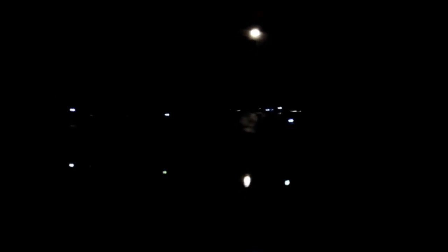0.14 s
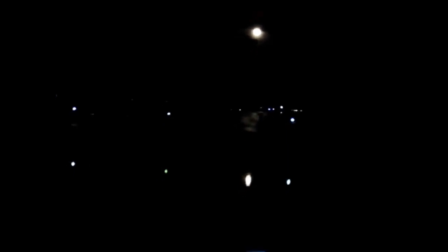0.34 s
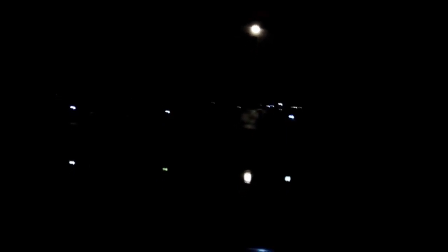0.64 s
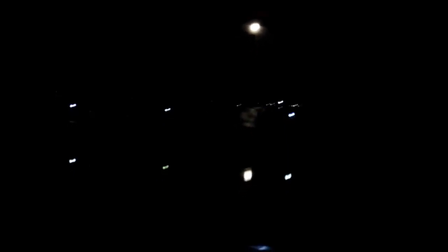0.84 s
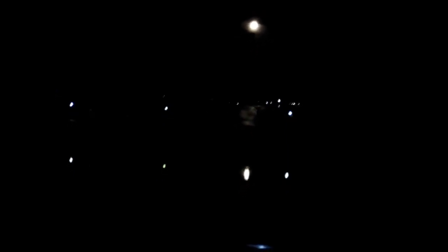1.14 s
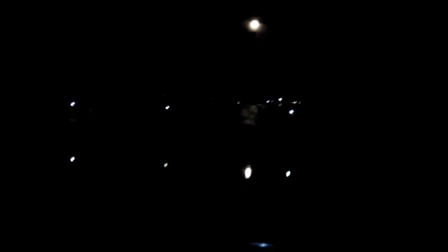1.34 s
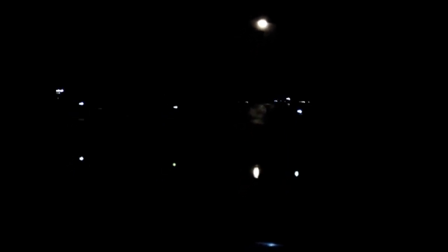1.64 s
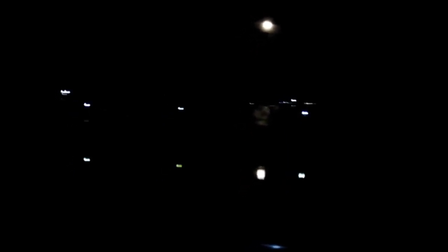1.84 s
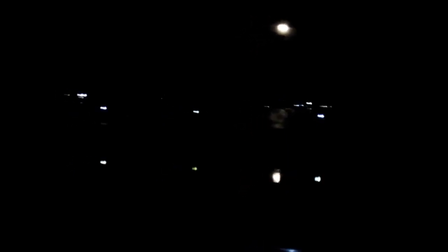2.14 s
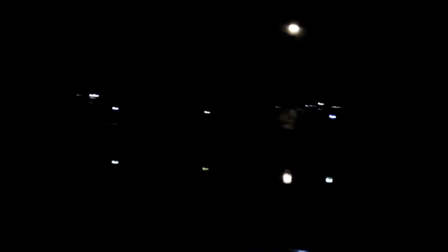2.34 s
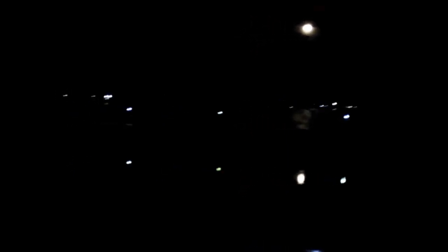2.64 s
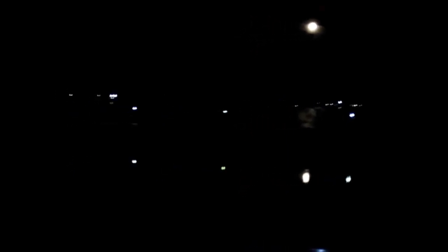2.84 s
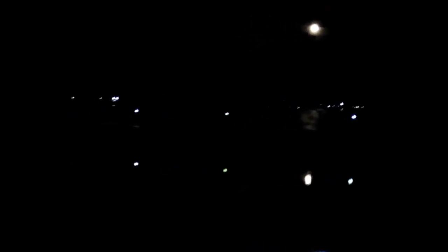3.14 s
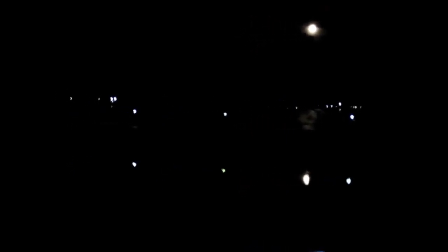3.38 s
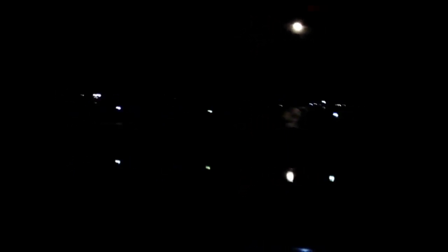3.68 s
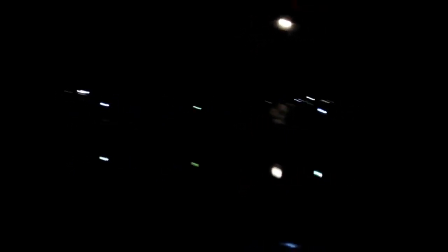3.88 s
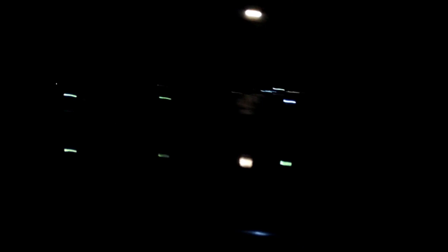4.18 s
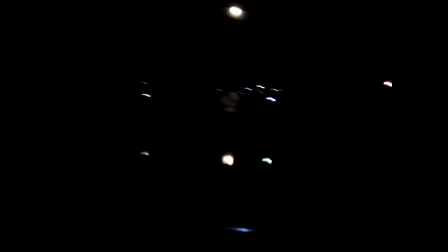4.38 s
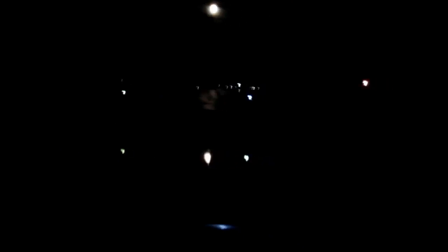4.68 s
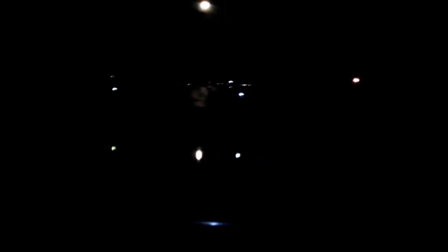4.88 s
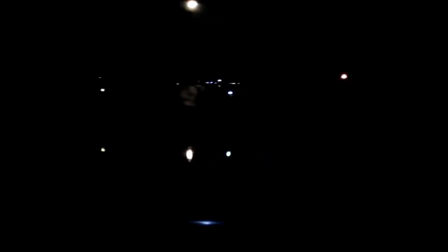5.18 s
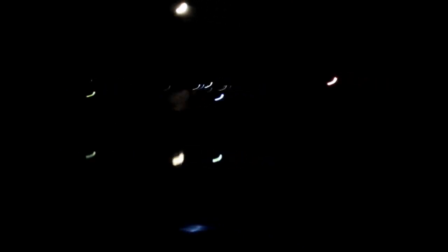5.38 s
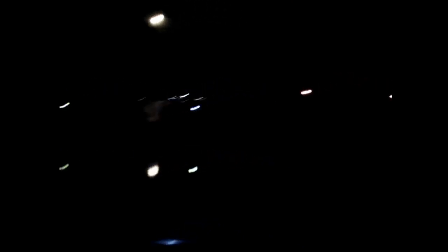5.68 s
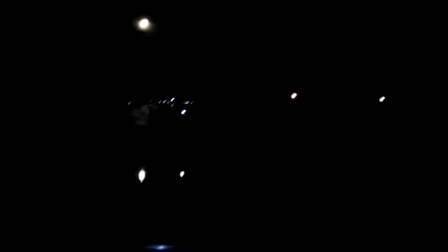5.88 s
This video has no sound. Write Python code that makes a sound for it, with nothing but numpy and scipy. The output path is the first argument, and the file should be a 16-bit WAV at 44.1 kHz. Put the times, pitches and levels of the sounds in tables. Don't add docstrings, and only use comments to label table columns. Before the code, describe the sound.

A phone's one microphone hears a dark shore at night. Continuous shrill chatter from hundreds of far birds begins quietly, with only a few low near calls. Soon clear high pipes and hoarse middle whistles join, overlapping with deeper birds and small shrill ones, echoing briefly off banks and water. The chorus pulses quickly and ends at its loudest. Steady hiss, very high insect fizz, thin electronic whine and soft far traffic stay underneath.

```python
import sys
import numpy as np
from scipy import signal
from scipy.fft import rfft, irfft, next_fast_len
from scipy.io import wavfile
from scipy.ndimage import uniform_filter1d

SR = 44100
rng = np.random.default_rng(int(sys.argv[2]) if len(sys.argv) > 2 else 0)


def pcm_store(signal):
    levels = np.round(np.clip(np.atleast_2d(signal), -1, 1) * 32767)
    wavfile.write(sys.argv[1], SR, levels.astype(np.int16).T)


def gain_from_db(level_db):
    decades = np.asarray(level_db, float) / 20
    return 10 ** decades


N = 265393


def evened(x):
    return x / np.sqrt(np.mean(x ** 2) + 1e-20)


def coloured(x, points):
    curve_hz, curve_db = np.transpose(points)
    size = next_fast_len(N)
    hz = np.fft.rfftfreq(size, 1 / SR)
    level_db = np.interp(np.log(hz + 1), np.log(curve_hz + 1), curve_db, left=-200, right=-200)
    gain = gain_from_db(level_db) * (hz < 15720)
    return evened(irfft(rfft(x, size) * gain, size)[:N])


def drift(seconds):
    span = max(round(seconds * SR), 1)
    once = uniform_filter1d(rng.standard_normal(N), span)
    return evened(uniform_filter1d(once, span))


def add(mix, start_s, sound):
    part = mix[max(round(start_s * SR), 0):][:len(sound)]
    part += sound[:len(part)]


def rasp(share, seconds):
    beats = drift(seconds) + 1j * drift(seconds)
    breath = drift(seconds / 4) + 1j * drift(seconds / 4)
    waver = np.exp(.8j * drift(.014))
    return waver * (np.sqrt(1 - share) + np.sqrt(share / 2) * (.9 * beats + .44 * breath))


def whistle(length_s, start_hz, middle_hz, end_hz, rough, partials=(1.,), edge=0.76):
    u = np.linspace(0, 1, max(round(length_s * SR), 8))
    hz = (1 - u) * (1 - 2 * u) * start_hz
    hz += 4 * u * (1 - u) * middle_hz
    hz += u * (2 * u - 1) * end_hz
    phase = 2 * np.pi * np.cumsum(hz) / SR
    tone = sum(a * np.exp(1j * (k + 1) * phase) for k, a in enumerate(partials))
    at = int(rng.random() * (N - SR))
    rough_tone = evened((tone * rough[at:at + len(u)]).real)
    return np.sqrt(len(partials)) * rough_tone * signal.windows.tukey(len(u), edge)


def shore(x, t60, wet_db):
    at = np.arange(40, SR // 2, 22)
    taps = np.zeros(SR)
    signs = rng.choice([-1., 1.], len(at))
    taps[at + rng.integers(0, 22, len(at))] = signs * gain_from_db(-60 * at / SR / t60)
    taps *= gain_from_db(wet_db) / np.linalg.norm(taps)
    taps[0] = 1
    return signal.fftconvolve(x, taps / np.linalg.norm(taps))[:N]


# (pitch_hz, level_db)
NIGHT_TONE = [(12, -54), (20, -17.5), (65, -4), (134, -2.5), (182, -5), (280, -5), (321, -6), (415, -7.5),
              (476, -7), (867, -9.5), (1200, -13.5), (1560, -50), (2640, -120)]


def night_rumble():
    air = coloured(rng.standard_normal(N), NIGHT_TONE) * gain_from_db(-61 + 1.4 * drift(0.036))
    hum = coloured(rng.standard_normal(N), [(100, -28), (140, -10), (180, -29.0)])
    return air + hum * gain_from_db(-71.5 + 5.5 * drift(0.024))


def microphone_hiss():
    tone = [(1000, 6.0), (7000, 3.5), (10000, 1.5), (15900, 1.5)]
    return coloured(rng.standard_normal(N), tone) * gain_from_db(-56.5)


# (pitch_hz, level_db)
LAMP_TONES = [
    (6449, -70),
    (12898, -82),
]


def lamp_whine():
    turns = np.cumsum(1 + 0.00016 * drift(0.12)) / SR
    return sum(np.sqrt(2) * gain_from_db(db) * np.sin(2 * np.pi * hz * turns) for hz, db in LAMP_TONES)


# (pitch_hz, level_db)
INSECT_TONE = [(13000, -55), (13900, -16), (14900, -6.5), (15400, -1.5), (15720, -1)]


def insects():
    swell_db = 1.3 * drift(0.0017) + 0.64 * drift(0.038) + 1.1 * drift(0.13)
    ticks = rng.standard_normal(N) * gain_from_db(swell_db)
    return gain_from_db(-52) * coloured(ticks, INSECT_TONE)


# (pitch_hz, level_db)
FLOCK_TONE = [(650, -24), (1100, -16.5), (1720, 1), (2190, -4), (3030, -2), (3580, 0), (4120, -3.5),
              (5510, -1.5), (6610, -4.5), (8000, -17.5), (10400, -51), (17600, -120)]
# (time_s, effort_db)
FLOCK_EFFORT = [(0, -53.5), (.45, -52.5), (.69, -51.5), (1.34, -51.5), (1.79, -51), (2.16, -49.5),
                (2.75, -46), (2.97, -50.5), (3.5, -47), (3.9, -46.5), (4.34, -50), (4.74, -42.5),
                (4.89, -47), (5.05, -43.5), (5.19, -45.5), (5.5, -43), (5.65, -44), (6.02, -42.5)]


def far_flock():
    calls, rough = np.zeros(N), rasp(share=.7, seconds=.003)
    for when, size, pitch, bend, length in rng.random((900, 5)):
        hz = 1150 * (2250 / 1150) ** pitch
        arch = hz * (.99 - .06 * bend), hz, hz * (.92 + .07 * bend)
        call = whistle(.05 + .1 * length, *arch, rough, (1., 1., 1., 1.))
        add(calls, when * N / SR - .06, gain_from_db(5. * size) * call)
    blur = evened(shore(calls, t60=.2, wet_db=-3.)) + .8 * rng.standard_normal(N)
    hz, t, z = signal.stft(blur, SR, nperseg=512)
    z /= np.sqrt(np.mean(abs(z) ** 2, axis=1))[:, None]

    time_s, effort_db = np.transpose(FLOCK_EFFORT)
    extra_db = np.interp(t, time_s, effort_db) + 51
    low = np.clip((2500 - hz) / 400, 0, 1)[:, None]
    shrill = np.clip((hz - 4300) / 600, 0, 1)[:, None]
    z *= gain_from_db(1.5 * low - (0.5 * low + 0.81 * shrill) * extra_db)

    wave_s, crest_s, join_s, depth_db = .343, 2.43, 2.05, 2
    joined = np.clip(2 * (t - join_s) + 1, 0, 1)
    wave_db = depth_db * joined * np.cos(2 * np.pi * (t - crest_s) / wave_s)
    z *= gain_from_db((1 - low - shrill) * wave_db)
    flock = coloured(signal.istft(z, SR, nperseg=512)[1][:N], FLOCK_TONE)
    return gain_from_db(np.interp(np.arange(N) / SR, time_s, effort_db) + 1.0) * flock


def sing(calls, arch, rough, sides_db=None):
    out = np.zeros(N)
    partials = (gain_from_db(sides_db[0]), 1, gain_from_db(sides_db[1])) if sides_db is not None else (1,)
    for start_s, length_s, hz, db, *glide_hz in calls:
        stray = .008 * rng.uniform(-1, 1, 2)
        start_hz, end_hz = hz * (np.array(arch) + stray) + sum(glide_hz) * np.array([-.5, .5])
        pitches = np.array([start_hz, hz, end_hz])
        if sides_db is not None:
            pitches = pitches / 2
        call = whistle(length_s + .03, *pitches, rough, partials, edge=0.65)
        add(out, start_s - .015, gain_from_db(db) * call / np.sqrt(len(partials)))
    return out


# (start_s, length_s, loudest_partial_hz, level_db)
PIPER_CALLS = [(1.215, .17, 3620, -47.5), (1.37, 0.13, 3480, -54.5), (1.492, 0.13, 3610, -48),
               (1.985, 0.12, 3634, -47), (2.48, 0.19, 3610, -54.5), (2.54, .13, 3550, -49.5),
               (2.65, .18, 3640, -52.5), (3.01, 0.15, 3640, -52), (3.053, 0.14, 3670, -52),
               (3.292, 0.1, 3695, -49.5), (3.417, 0.054, 3750, -53), (3.805, 0.11, 3730, -47),
               (3.956, .12, 3683, -48.5), (4.22, 0.22, 3700, -52.5), (4.37, 0.15, 3590, -48),
               (4.702, 0.19, 3400, -48), (4.905, 0.081, 3740, -42), (5.118, .15, 3740, -43.5),
               (5.43, .14, 3520, -47), (5.471, 0.066, 3650, -44), (5.675, 0.12, 3692, -42.5),
               (5.754, .13, 4010, -46), (5.78, 0.081, 3330, -56), (5.905, 0.076, 3736, -39.5)]
# (start_s, length_s, loudest_partial_hz, level_db, glide_hz)
CALLER_CALLS = [(1.613, 0.096, 2970, -52.5, -82), (1.706, .07, 3000, -52, 5), (1.99, .1, 2920, -53.5, -55),
                (2.083, 0.21, 2936, -50.5, -91), (2.329, .1, 2854, -46.5, 122),
                (2.409, 0.17, 2803, -47.5, -83), (2.617, 0.12, 2830, -47.5, 289),
                (2.767, .1, 2850, -47, -100), (2.869, 0.16, 2804, -47, -160),
                (3.105, 0.056, 2920, -46.5, 300), (3.357, 0.29, 2935, -51, 60),
                (3.672, .14, 2878, -45.5, 199), (3.703, .12, 2990, -42.5, -34),
                (3.8, .12, 3080, -52.5, 258), (4.0, 0.093, 3008, -48, 280),
                (4.062, 0.096, 2980, -47.5, -240), (4.339, 0.085, 3003, -42, 135),
                (4.4, 0.13, 2880, -44.5, -200), (4.685, .11, 2884, -45, 63),
                (5.398, 0.081, 2900, -43.5, -90), (5.452, .09, 2796, -45.5, -130),
                (5.763, .135, 2794, -47.5, -66)]
# (start_s, length_s, loudest_partial_hz,
# level_db, glide_hz)
CALLER_SECOND_CALLS = [(1.601, 0.098, 3076, -49, -170), (2.693, 0.095, 3230, -50, 137), (2.72, 0.1, 3155, -47.5, 38),
                       (2.823, 0.086, 3310, -50, -125), (3.017, 0.089, 3140, -44, -4), (3.146, 0.08, 3230, -50, 208),
                       (3.361, 0.15, 3050, -50, -120), (3.483, 0.059, 3260, -47, 3), (3.808, 0.069, 3190, -52, -100),
                       (4.03, 0.12, 3116, -50, -100), (4.11, 0.18, 3195, -47, 150), (4.442, .12, 3090, -49, 168),
                       (4.779, 0.14, 3080, -46.5, -67), (5.07, 0.145, 3310, -49, 120), (5.133, 0.17, 3000, -52, -57),
                       (5.495, 0.11, 3120, -51, 43), (5.97, 0.045, 3110, -49.5, 52)]
# (start_s, length_s, loudest_partial_hz, level_db, glide_hz)
NEIGHBOUR_CALLS = [(0.196, 0.12, 2480, -54.5, -120), (.3, 0.11, 2335, -46.5, -32.5),
                   (.43, 0.12, 2300, -57, -3), (1.603, 0.14, 2540, -58.5, 6),
                   (1.694, 0.093, 2680, -55.5, -22), (2.421, 0.12, 2716, -60, 145),
                   (2.61, 0.072, 2684, -45, 119), (2.995, 0.097, 2676, -50, 22),
                   (3.114, 0.14, 2670, -53, 90), (3.356, 0.19, 2290, -56, -63),
                   (4.112, 0.15, 2550, -53, -96), (4.404, 0.13, 2716, -46, 35),
                   (4.686, 0.19, 2700, -48.5, 118), (4.735, 0.1, 2590, -54, -63),
                   (5.029, 0.11, 2750, -45, 48), (5.066, 0.15, 2620, -50.5, 117),
                   (5.457, 0.12, 2610, -53, 20)]
# (start_s, length_s, pitch_hz, level_db)
LOW_CALLS = [(.157, 0.24, 1770, -56.5), (2.03, .1, 2132, -51.5), (2.644, 0.13, 1905, -51),
             (3.044, .16, 1976, -53.5), (3.179, 0.15, 1670, -53.5), (3.564, 0.2, 1732, -48.5),
             (3.74, 0.11, 1695, -53), (3.939, 0.14, 1797, -54), (3.954, 0.091, 1955, -49.5),
             (4.595, 0.19, 1817, -48), (4.622, 0.127, 1960, -50.5), (4.791, 0.14, 2020, -50.5),
             (4.916, 0.133, 1772, -48.5), (5.172, 0.23, 1837, -54), (5.687, 0.11, 2090, -54),
             (5.698, 0.15, 1840, -51.5)]
# (start_s, length_s, pitch_hz, level_db)
DEEP_CALLS = [(0.248, 0.11, 1190, -60.5), (1.182, .11, 1300, -55.5), (2.142, 0.059, 1490, -56),
              (2.267, 0.16, 1490, -58), (2.642, 0.12, 1500, -53.5), (3.2, .16, 320, -61.5),
              (3.325, 0.13, 1465, -54), (3.677, 0.18, 1480, -73), (3.817, 0.13, 1550, -49),
              (4.369, 0.26, 1455, -68), (4.603, 0.13, 1620, -55), (4.646, 0.082, 1370, -55),
              (4.974, 0.11, 1570, -51), (5.22, 0.097, 1585, -49), (5.306, 0.16, 1550, -47),
              (5.737, 0.16, 1305, -58.5)]
# (start_s, length_s, pitch_hz, level_db)
CHICK_CALLS = [(0.458, 0.089, 4550, -59), (1.068, 0.093, 4270, -65), (1.237, .13, 5360, -55),
               (1.47, 0.204, 5230, -52.5), (1.6, 0.097, 4580, -54), (2.682, 0.18, 4500, -69),
               (3.767, 0.202, 5560, -55), (3.554, 0.22, 5500, -56), (4.278, 0.19, 5330, -51.5),
               (4.689, 0.1, 4150, -49.5), (4.743, 0.089, 4600, -53), (4.836, 0.084, 5010, -50),
               (4.91, 0.1, 5370, -53), (5.1, 0.086, 5350, -48.5), (5.395, 0.13, 4195, -50.5),
               (5.68, 0.12, 5400, -54), (5.705, 0.21, 4170, -48.5), (5.777, 0.15, 4290, -63)]
CALL_ARCHES = [
    (.992, .978),
    (.99, .99),
    (.995, .995),
    (1, 1),
    (.99, .975),
    (.98, .985),
    (.995, .99),
]
# (below_it_db, above_it_db)
SIDE_PARTIALS = [
    (-12.5, -12.5),
    (-12.5, -17.5),
    (-19.5, -11.5),
    (-15.5, -30),
]


def near_calls():
    clear, hoarse = rasp(share=.28, seconds=.0045), rasp(share=.48, seconds=.004)
    out = sing(PIPER_CALLS, CALL_ARCHES[0], clear, SIDE_PARTIALS[0])
    out += sing(CALLER_CALLS, CALL_ARCHES[1], hoarse, SIDE_PARTIALS[1])
    out += sing(CALLER_SECOND_CALLS, CALL_ARCHES[2], hoarse, SIDE_PARTIALS[2])
    out += sing(NEIGHBOUR_CALLS, CALL_ARCHES[3], clear, SIDE_PARTIALS[3])
    out += sing(LOW_CALLS, CALL_ARCHES[4], clear)
    out += sing(DEEP_CALLS, CALL_ARCHES[5], clear)
    out += sing(CHICK_CALLS, CALL_ARCHES[6], hoarse)
    return shore(out, t60=.1, wet_db=-7.)


def scene():
    night = night_rumble() + microphone_hiss() + lamp_whine()
    return np.tile(night + insects() + far_flock() + near_calls(), (2, 1))


# (block_centre_s, rounding_step_db)
THIN_MOMENTS = [(.1585, -39), (.3211, -36), (.3443, -34), (.5765, -39), (.6926, -38), (1.0409, -38),
                (1.0873, -39), (1.4356, -37), (1.4589, -34), (1.8072, -39), (1.9233, -39), (2.2948, -39),
                (3.0146, -38), (3.3861, -38), (4.1988, -38), (5.8242, -35), (5.8474, -33)]
# (pitch_hz, step_db)
COARSER_STEPS = [(300, -1), (900, 1), (1500, 4), (3000, 3), (6000, 1.5), (8000, -3), (13500, -3),
                 (14500, 3)]


def thinned(dry):
    block, first = 1024, 848
    n, k = np.arange(2 * block), np.arange(block) + .5
    waves = np.cos(np.pi / block * np.outer(n + .5 + block / 2, k))
    waves *= np.sqrt(2 / block) * np.sin(np.pi * (n + .5) / (2 * block))[:, None]
    coarser_db = np.interp(k * SR / (2 * block), *np.transpose(COARSER_STEPS))
    out = dry.copy()
    for centre_s, step_db in THIN_MOMENTS:
        at = first + block * (round((centre_s * SR - first) / block) - 1)
        tones = dry[:, at:at + 2 * block] @ waves
        step = gain_from_db(step_db + coarser_db)
        kept = np.sign(tones) * np.floor(abs(tones) / step + .4) * step
        out[:, at:at + 2 * block] += (kept - tones) @ waves.T
    return out


def roll_off(x):
    return signal.sosfilt(signal.butter(12, 17110, fs=SR, output="sos"), x)


def record(dry):
    mix = thinned(dry)
    return roll_off(mix)


dry = scene()
out = record(dry)
pcm_store(out)
```